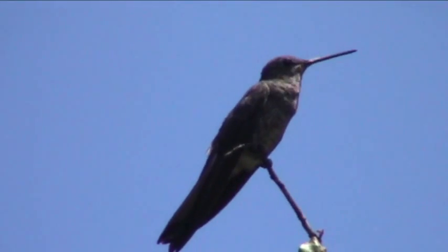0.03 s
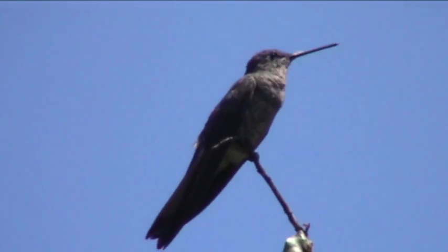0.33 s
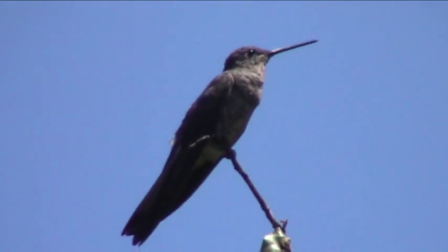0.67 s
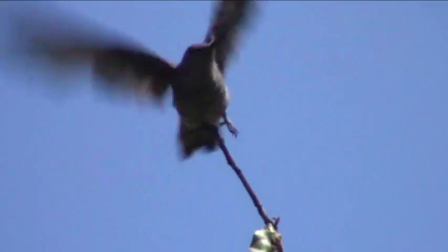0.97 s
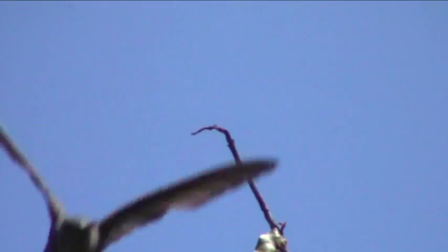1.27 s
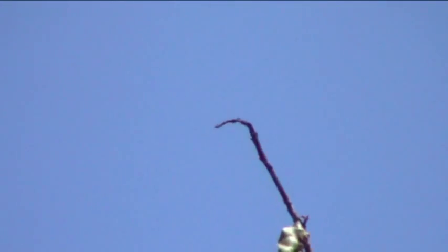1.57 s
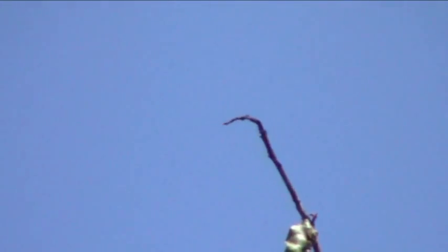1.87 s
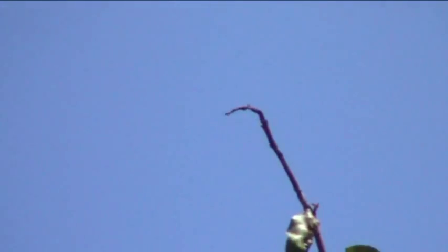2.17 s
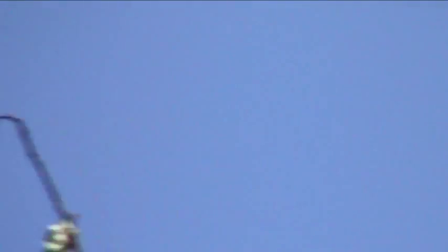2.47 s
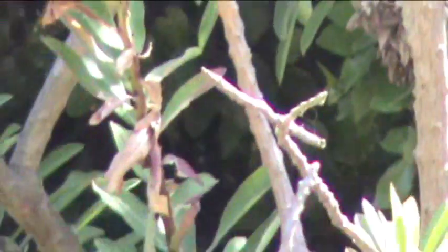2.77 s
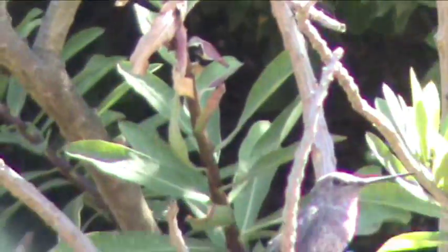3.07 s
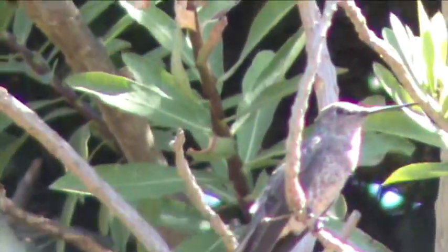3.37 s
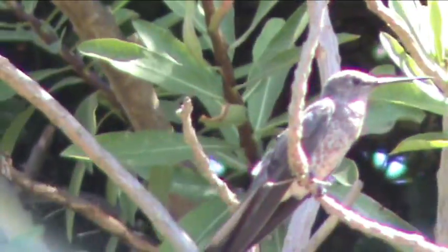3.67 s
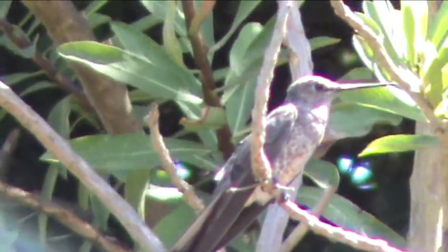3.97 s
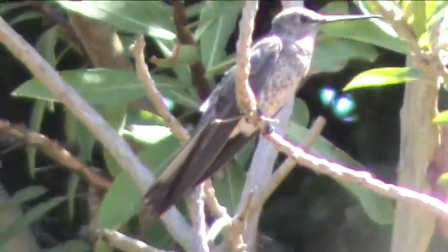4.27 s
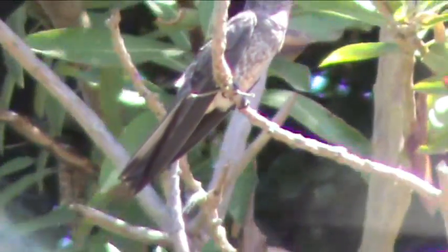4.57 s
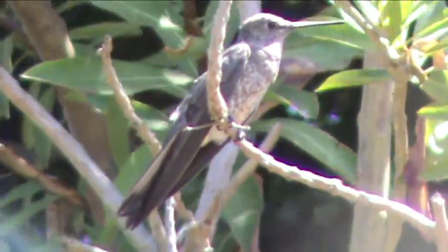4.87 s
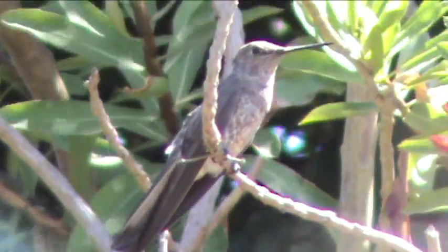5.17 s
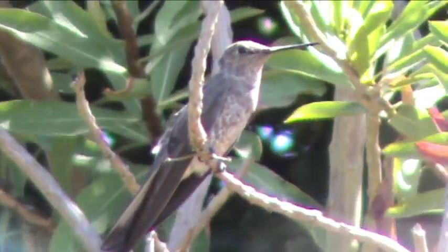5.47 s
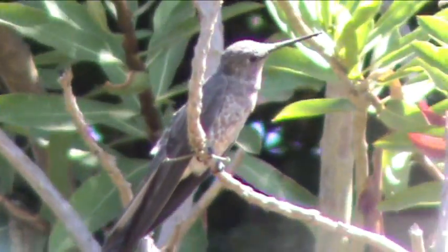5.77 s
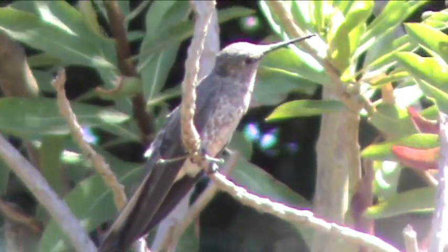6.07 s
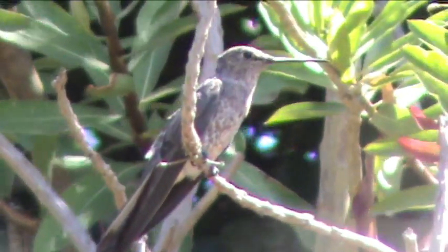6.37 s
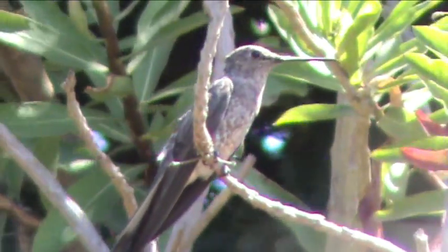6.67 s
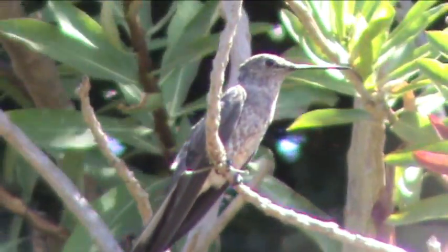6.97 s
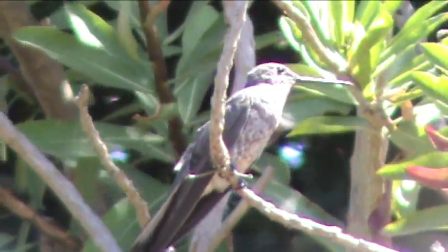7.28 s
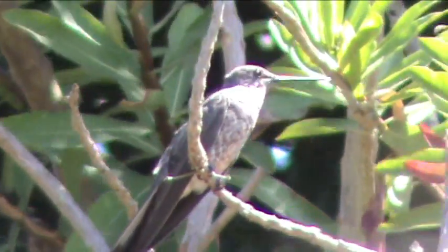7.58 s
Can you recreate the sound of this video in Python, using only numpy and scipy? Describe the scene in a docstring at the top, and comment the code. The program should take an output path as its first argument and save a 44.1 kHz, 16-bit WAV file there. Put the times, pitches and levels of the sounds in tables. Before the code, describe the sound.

From the start, wind buffets a hand-held camera's microphone in a garden, with low rumble, small thumps and light crackle. The gusts grow stronger from about 1 second and are heaviest between 1.2 and 2.3 seconds. Distant birds peep faintly, most clearly around 1.3 seconds. At 1.6 seconds a nearby hummingbird gives one very short, high chirp that rises, then drops sharply with a hoarse edge. At about 2.75 seconds the sound drops out for an instant. It returns much calmer, with a light low breeze, a soft hiss of air and leaves and a faint camera motor whine. A few soft ticks and bumps come from fingers on the camera. Just before 6 seconds its plastic casing gives one sharp, close snap. Small finger ticks and creaky slides follow, strongest around 6.7 seconds, and die away near 7.5 seconds.

```python
"""Hummingbird in a windy garden

Gusts and eddies buffet the ports of a hand-held camera. A near hummingbird gives one high, arched
chirp; farther birds peep and whistle. After a brief dropout the air is calmer: garden hiss, faint
motor whine, fingers ticking and sliding on the camera's casing, and one sharp snap of the plastic."""
import sys
import numpy as np
from scipy import signal
from scipy.fft import rfft, irfft, next_fast_len
from scipy.io import wavfile
from scipy.ndimage import uniform_filter1d

SR = 44100
rng = np.random.default_rng(int(sys.argv[2]) if len(sys.argv) > 2 else 0)


def output_pcm(signal):
    """Save a mono or channel-first signal as 16-bit PCM at the path in sys.argv[1].

    Samples are clipped to [-1, 1] before scaling.
    """
    pcm = np.clip(np.atleast_2d(signal).T, -1, 1) * 32767
    wavfile.write(sys.argv[1], SR, np.round(pcm).astype(np.int16))


N = 336483
TIME = np.arange(N) / SR
GUST_RISE = 0.48  # share of the length spent rising
CHIRP_S, CLIMB_S, PLUNGE_S = 1.617, .055, .0135  # onset, then two durations
ACCENT_DELAY_S = .011

# stereo width of wind: (frequency [Hz], side minus mid [dB])
WIND_WIDTH = [(25, -7), (60, -9.5), (105, -3), (170, -1.5), (350, 8.5), (4000, -4)]


def undb(db):
    """Decibels to gain."""
    return 10 ** (np.asarray(db) / 20)


def curve(table):
    """Linear interpolation of (time [s], value) rows."""
    return np.interp(TIME, *np.transpose(table))


def gain_at(hz, points):
    """Gain of a (frequency [Hz], level [dB]) spectrum, interpolated in log frequency."""
    f, db = np.transpose(points)
    return undb(np.interp(np.log(hz + 1), np.log(f), db))


def noise(colour, width):
    """Stereo noise of given spectrum and width; mid rms 1."""
    size = next_fast_len(N)
    hz = np.arange(size // 2 + 1) * SR / size
    spectra = rfft(rng.standard_normal((2, size))) * gain_at(hz, colour)
    mid = irfft(spectra[0], size)[:N]
    side = irfft(spectra[1] * gain_at(hz, width), size)[:N]
    return np.array([mid + side, mid - side]) / mid.std()


def walk(rate_hz):
    """Smoothed random steps; standard deviation 1."""
    hold = max(int(SR / rate_hz), 2)
    steps = np.repeat(rng.standard_normal(N // hold + 2), hold)
    smooth = uniform_filter1d(uniform_filter1d(steps, hold), hold)[:N]
    return smooth / smooth.std()


def flicker(rate_hz, depth_db):
    """Random gain of unit power."""
    gain = undb(depth_db * walk(rate_hz))
    return gain / np.sqrt(np.mean(gain ** 2))


def swells(table, rise):
    """Summed power of skewed Gaussian swells: (crest [s], level [dB], length [s])."""
    power = 0
    for s, db, length_s in table:
        width_s = length_s * np.where(TIME < s, rise, 1 - rise)
        power = power + undb(db) ** 2 * np.exp(-2 * ((TIME - s) / width_s) ** 2)
    return power


def gate(s, length_s, edge_s):
    """Trapezoid note envelope."""
    return np.clip(np.minimum(TIME - s, s + length_s - TIME) / edge_s, 0, 1)


def band(x, lo_hz, hi_hz, order=2):
    """Causal band-pass."""
    sos = signal.butter(order, [lo_hz, min(hi_hz, .45 * SR)], "band", fs=SR, output="sos")
    return signal.sosfilt(sos, x)


def pan(db):
    """Stereo gains for a left minus right level."""
    return undb(np.array([[db], [-db]]) / 2)


def add(out, s, sound):
    """Mix a stereo sound in at time s."""
    i = int(s * SR)
    out[:, i:i + sound.shape[1]] += sound[:, :N - i]


def wind(calm_s=2.78, eddy_db=-15.5, eddy_growth=1.35, roar_growth=0.86, breeze_db=4.7):
    """Gusts roar on the ports and shed eddies; from calm_s only a breeze is left."""
    # gusts: (crest [s], relative level [dB], length [s])
    gusts = [(0.21, -38, 0.1), (0.34, -37.5, .07), (0.75, -39, 0.18), (1.04, -38, 0.15),
             (1.24, -30.5, 0.088), (1.51, -33, 0.17), (1.69, -29, 0.21), (2.03, -38, 0.047),
             (2.22, -29.3, 0.11), (2.57, -37.5, 0.1), (2.95, -45, 0.11), (3.48, -44, 0.094),
             (3.79, -46.5, 0.18), (4.68, -43, 0.17)]
    # steady wind, later breeze, deep rumble: (time [s], relative level [dB])
    flow_levels = [(0, -46), (0.88, -46), (0.97, -39), (2.25, -39), (2.38, -52.5), (2.78, -54)]
    breeze_levels = [(2.9, -54.5), (4.84, -49.5), (5.37, -53.5), (7.6, -51.5)]
    rumble_levels = [(0, -47.5), (0.88, -50), (0.98, -39.5), (1.4, -41.5), (1.72, -31), (1.88, -42),
                     (2.03, -34), (2.4, -40), (2.6, -39.5), (2.74, -48)]
    # spectra: (frequency [Hz], density [dB])
    roar_colour = [(40, -13), (65, -3.5), (105, 6), (150, -2.5), (260, -9.5), (420, -23), (800, -67)]
    eddy_colour = [(200, -35.5), (400, 8), (650, 0.5), (1000, -8), (1600, -19.5), (2500, -30), (5000, -58)]
    rumble_colour = [(10, -9), (24, 27), (36, 33), (55, 24.5), (90, -35.5)]
    breeze_colour = [(10, -19), (25, -1.5), (42, 2.5), (65, -9.5), (98, 0), (135, -14.5), (200, -18.5),
                     (320, -32), (700, -54)]
    steady_db = np.where(TIME < calm_s, curve(flow_levels), curve(breeze_levels))
    gust_db = 10 * np.log10(undb(steady_db) ** 2 + swells(gusts, GUST_RISE))
    top_db = gust_db.max()
    roar = noise(roar_colour, WIND_WIDTH) * flicker(rate_hz=43, depth_db=1.6)
    roar *= undb(top_db + roar_growth * (gust_db - top_db))
    eddies = noise(eddy_colour, WIND_WIDTH) * flicker(rate_hz=110, depth_db=5.0)
    eddies *= undb(top_db + eddy_db + eddy_growth * (gust_db - top_db))
    rumble = noise(rumble_colour, WIND_WIDTH) * undb(curve(rumble_levels))
    breeze = noise(breeze_colour, WIND_WIDTH) * flicker(rate_hz=31, depth_db=2.0)
    breeze *= undb(gust_db + breeze_db)
    return np.where(TIME < calm_s, roar + eddies * pan(-5.5) + rumble * pan(2.8), breeze)


def motor(drift=0.00401):
    """The camera's motor whines in two slightly wavering tones."""
    # tones: (frequency [Hz], relative level [dB])
    tones = [(629, -67.5), (839, -67)]
    capsule_rad = np.array([[0], [1.4]])
    whine = 0
    for hz, db in tones:
        phase = 2 * np.pi * np.cumsum(hz * (1 + drift * walk(rate_hz=12))) / SR
        gain = np.sqrt(2) * undb(db) * flicker(rate_hz=7.6, depth_db=1.5)
        whine = whine + gain * np.sin(phase + capsule_rad)
    return whine * pan(-10.5)


def garden():
    """Distant air and leaves hiss; the motor's whine fades up with them."""
    # hiss envelope: (time [s], level [dB])
    hiss_levels = [(0, -72.5), (1.0, -66), (2.0, -60), (3.0, -54.5), (4.6, -51), (7.63, -52.3)]
    # hiss spectrum: (frequency [Hz], density [dB])
    hiss_colour = [(400, 0), (1200, -1), (2000, -4.5), (3200, -8.5), (5000, -11), (12000, -15.3),
                   (15500, -20.5)]
    # stereo width: (frequency [Hz], side minus mid [dB])
    air_width = [(200, -2.5), (1300, 2.5), (2500, 2.5), (5000, 0.5), (10000, 1), (13000, -18)]
    hiss_db = curve(hiss_levels)
    hiss = noise(hiss_colour, air_width) * undb(hiss_db) * flicker(rate_hz=9, depth_db=0.93)
    return hiss + motor() * undb(hiss_db - hiss_db.max())


def buffets(spike_s=.0007, leak=.15, flutter_db=-23.5, rise_s=0.0034, fall_s=.011):
    """A lone eddy slaps one port with a pressure spike, sucks at the other and flutters away."""
    # eddy hits: (time [s], peak before filtering [dB], left minus right [dB])
    hits = [(.12, -24, -11), (.182, -12, 4.5), (.321, -16.5, 2.5), (.473, -26, -4), (.965, -7, -5),
            (.985, -17, -5), (1.024, -10.5, -5.5), (1.066, -17, -2), (1.082, -13, -5), (1.15, -16.5, -4),
            (1.204, -18, 4), (1.241, -19, -7), (1.624, -13, -8), (1.658, -10, -7.5), (1.711, -16, -5),
            (1.829, -20, -7)]
    # (frequency [Hz], density [dB])
    flutter_colour = [(40, -7), (110, 5), (300, 2), (600, -10), (1800, -27), (9000, -83)]
    spikes, strength = 0, 0
    for s, db, pan_db in hits:
        age_s = TIME - s
        ports = np.array([[1], [-leak]] if pan_db > 0 else [[leak], [-1]])
        spikes = spikes + undb(db) * ports * np.exp(-abs(age_s) / spike_s)
        envelope = np.exp(-abs(age_s) / np.where(age_s < 0, rise_s, fall_s))
        strength = strength + undb(db) * pan(pan_db) * envelope
    flutter = noise(flutter_colour, WIND_WIDTH)
    slaps = band(band(spikes + 1e-18, 60, 4500, order=1), 30, 2200)
    return slaps + undb(flutter_db) * strength * flutter


def crackle(pops_per_s=450):
    """Tiny eddies of uneven size burst on each port."""
    # flurries: (crest [s], level [dB], length [s])
    flurries = [(.12, -52.5, 0.12), (.35, -54.5, 0.083), (.51, -56, 0.028), (1.0, -53, .06),
                (1.42, -55, .04)]
    pops = (rng.random((2, N)) < pops_per_s / SR) * rng.standard_normal((2, N))
    pops = band(band(pops, 360, 720, order=1), 300, 2300, order=3)
    return pops / pops.std() * np.sqrt(swells(flurries, GUST_RISE))


def syrinx(hz, gain, tilt_db, jitter, shimmer_db):
    """A bird's voice: one unsteady tone with overtones."""
    # harmonics: (multiple, level [dB])
    harmonics = [(1, 0), (2, -13), (3, -23)]
    phase = 2 * np.pi * np.cumsum(hz * (1 + jitter * walk(rate_hz=900))) / SR
    voice = sum(undb(db + (k - 1) * tilt_db) * np.sin(k * phase) for k, db in harmonics)
    return np.sqrt(2) * voice * gain * flicker(rate_hz=360, depth_db=shimmer_db)


def whistlers():
    """Far birds: faint peeps, and a short held note before a falling slur."""
    # notes: (onset [s], length [s], start [Hz], end [Hz], level [dB], tilt [dB/harmonic])
    notes = [(.895, .03, 2660, 2900, -70, -6), (1.267, .034, 3240, 3200, -56, -6),
             (1.3, .062, 3170, 2790, -71, 7), (1.318, .075, 3080, 2430, -65, -15),
             (2.335, .028, 2750, 2520, -68, -6)]
    out = 0
    for s, length_s, start_hz, end_hz, db, tilt_db in notes:
        hz = np.interp(TIME, [s, s + length_s], [start_hz, end_hz])
        gain = undb(db) * gate(s, length_s, edge_s=length_s / 5)
        out = out + syrinx(hz, gain, tilt_db, jitter=.02, shimmer_db=2.5)
    return out


def hummingbird(tilt_db=-2, harsh_db=15):
    """The chirp swells as its pitch climbs, then plunges ever faster, turning harsh as it fades."""
    start_hz, ceiling_hz, end_hz, ease_s = 4330, 5170, 1900, .024
    crest_db, swell_db, fade_db = -30, 17, 29
    accent_db, accent_width_s = 7, .004
    age_s = np.clip(TIME - CHIRP_S, 0, CLIMB_S + PLUNGE_S)
    climb = np.minimum(age_s / CLIMB_S, 1)
    plunge = np.maximum(age_s - CLIMB_S, 0) / PLUNGE_S
    hz = ceiling_hz - (ceiling_hz - start_hz) * np.exp(-age_s / ease_s)
    hz -= (ceiling_hz - end_hz) * plunge ** 2
    accent = np.exp(-((age_s - ACCENT_DELAY_S) / accent_width_s) ** 2)
    db = crest_db - swell_db * (1 - climb) + accent_db * accent - fade_db * plunge ** 2
    gain = undb(db) * gate(CHIRP_S, CLIMB_S + PLUNGE_S, edge_s=.002)
    return syrinx(hz, gain, tilt_db + harsh_db * plunge, jitter=.004 + .04 * plunge, shimmer_db=1)


def rasp(accent_db=-57, plunge_db=-44, length_s=.014):
    """The chirp turns briefly hoarse at its accent and in mid-plunge."""
    hoarse = band(rng.standard_normal(N), 4400, 8000, order=1)
    bursts = [(CHIRP_S + ACCENT_DELAY_S, accent_db, length_s),
              (CHIRP_S + CLIMB_S + .5 * PLUNGE_S, plunge_db, length_s)]
    return band(hoarse, 3000, 13000) * np.sqrt(swells(bursts, rise=0.54))


def foliage(x, near_db, near_t60_s, far_db, far_t60_s, build_s):
    """Direct sound plus scatter from near leaves and far trees, much alike at both capsules."""
    t = np.arange(SR // 2) / SR
    tail = 0
    for db, t60_s in (near_db, near_t60_s), (far_db, far_t60_s):
        scatter = rng.standard_normal(len(t)) + .5 * rng.standard_normal((2, len(t)))
        scatter *= undb(-60 * t / t60_s) * np.minimum(t / build_s, 1) ** 2
        tail = tail + undb(db) * scatter / np.sqrt(np.sum(scatter ** 2) / 2)
    return x + signal.fftconvolve(x[None], tail, axes=1)[:, :N]


def birds():
    """The near hummingbird is fairly dry; the trees answer the far whistlers late."""
    near = foliage(hummingbird(), near_db=-11, near_t60_s=.14, far_db=-15.5, far_t60_s=.41, build_s=.008)
    hoarse = foliage(rasp(), near_db=-1, near_t60_s=.16, far_db=-5, far_t60_s=.36, build_s=.005)
    far = foliage(whistlers(), near_db=-7, near_t60_s=.25, far_db=-3, far_t60_s=.8, build_s=.085)
    return near + hoarse + far * pan(3)


def casing(rise_s=0.0014):
    """The plastic body's ring; each mode reaches each capsule in its own phase and strength."""
    # modes: (frequency [Hz], level [dB], t60 [s], phase between capsules [rad], left minus right [dB])
    modes = [(610, -9, 0.04, 2.2, 0), (820, -10.5, 0.047, 1.85, -2), (945, -5, .045, 0.93, 1),
             (1200, 2.5, 0.021, .5, 1), (1375, 3, 0.024, 1.4, 2), (1830, -11, 0.025, -2, -15),
             (2100, 3, .017, 0.84, 1), (2420, 4.5, 0.019, 2.2, -3.5), (3160, 8.5, .011, 2, 0),
             (3690, 11, .013, 2.5, 6), (4850, 8.5, .008, .3, -12)]
    t = np.arange(SR // 10) / SR
    ports = np.array([[.5], [-.5]])
    ring = 0
    for k, (hz, db, t60_s, phase_rad, pan_db) in enumerate(modes):
        tone = (-1) ** k * np.sin(2 * np.pi * hz * t + ports * phase_rad)
        ring = ring + undb(db - 60 * t / t60_s) * pan(pan_db) * tone
    return ring * (1 - np.exp(-(t / rise_s) ** 2))


def casing_ticks(scrape_cycles=3.5, spread=1.5, ring_db=-1, rustle_db=2.5, click_s=0.0014):
    """Each contact clicks, scrapes and rings the casing, longer and duller when softer."""
    # finger ticks and bumps, plus a small rebound just after the snap:
    # (time [s], level [dB], centre of contact force [Hz], relative click [dB])
    contacts = [(2.938, -48.5, 1100, -5), (4.778, -47.5, 1480, -10), (5.485, -47, 250, -6),
                (5.6, -49, 200, -10), (5.65, -51, 220, -12), (5.9665, -39.5, 1050, -14),
                (6.4, -38.5, 1250, -14), (6.496, -44.5, 1300, -10), (6.521, -43.5, 570, 5),
                (6.597, -43.5, 1450, -4), (6.671, -32, 1180, -11), (6.933, -46, 1800, -12),
                (6.976, -40.5, 1750, -11), (6.995, -41, 1200, -5), (7.16, -43, 1370, -2),
                (7.326, -38, 650, -10), (7.328, -41.5, 165, -20)]
    out, ring = np.zeros((2, N)), casing()
    t = np.arange(ring.shape[1]) / SR
    for s, db, force_hz, click_db in contacts:
        grit = rng.standard_normal(len(t)) + .5 * rng.standard_normal(ring.shape)
        contact = np.exp(-t * force_hz / scrape_cycles)
        knock = signal.fftconvolve(grit[:1] * contact, ring, axes=1)[:, :len(t)]
        knock = band(knock, force_hz / spread, force_hz * spread, order=3)
        knock /= knock[:, :SR // 100].std()
        rustle = band(grit, force_hz / spread, force_hz * spread)
        rustle = rustle / rustle.std() * np.sqrt(contact)
        click = band(grit, 2500, 6200, order=1)
        click = click / click.std() * np.exp(-t / click_s)
        tick = undb(ring_db) * knock + undb(rustle_db) * rustle + undb(click_db) * click
        add(out, s, tick * undb(db))
    return out


def snap(onset_s=5.9465, slip_s=.0006, body_db=-10.5):
    """A casing part grinds and snaps home: crack, crunch, body ring, rattle and faint echo."""
    crack_db, crack_s, crunch_db, crunch_s = -10, 0.0017, -14, .0026
    rattle_db, rattle_t60_s, echo_db, echo_t60_s = -14, .065, -35, .25
    out, ring = np.zeros((2, N)), casing()
    t = np.arange(ring.shape[1]) / SR
    burst = lambda crest_s: (t / crest_s) ** 2 * np.exp(2 - 2 * t / crest_s)
    grit = rng.standard_normal(ring.shape)
    shake = grit - 0.42 * grit[::-1]  # capsules shaken partly in antiphase
    crack = band(shake, 7340, 13000) * burst(crack_s)
    crunch = band(grit, 900, 5400) * burst(crunch_s)
    decay = undb(rattle_db - 60 * t / rattle_t60_s) + undb(echo_db - 60 * t / echo_t60_s)
    tail = band(rng.standard_normal(ring.shape), 780, 2200) * decay
    body = band(ring, 1220, 7900, order=1) * undb(body_db)
    add(out, onset_s, undb(crack_db) * crack + undb(crunch_db) * crunch)
    add(out, onset_s + slip_s, body + tail)
    return out


def finger_slides(slips_per_s=900, rub_db=-6):
    """Tiny, uneven slips of skin make the casing creak over the finger pad's dull rub."""
    # slides: (crest [s], level [dB], length [s])
    slides = [(6.705, -43, 0.08), (6.995, -49.5, 0.09), (7.28, -51.5, 0.18)]
    slips = (rng.random(N) < slips_per_s / SR) * undb(2 * rng.exponential(size=N))
    creak = band(signal.fftconvolve(slips[None], casing(), axes=1)[:, :N], 700, 2700)
    rub = band(rng.standard_normal((2, N)), 136, 275)
    friction = creak / creak.std() + undb(rub_db) * rub / rub.std()
    return friction * np.sqrt(swells(slides, rise=0.46))


def scene():
    """All sources at the two capsules."""
    air = wind() + buffets() + crackle() + garden()
    return air + birds() + snap() + casing_ticks() + finger_slides()


def record(dry, top_hz=15800):
    """The sound drops out briefly at a cut between two shots; the top treble is cut."""
    # dropout: (time [s], gain [dB])
    dropout = [(2.744, -0.5), (2.748, -17), (2.775, -45), (2.805, -30), (2.809, -3.5)]
    dipped = dry * undb(curve(dropout))
    return signal.sosfilt(signal.ellip(10, .2, 70, top_hz, fs=SR, output="sos"), dipped)


dry = scene()
out = record(dry)
output_pcm(out)
```